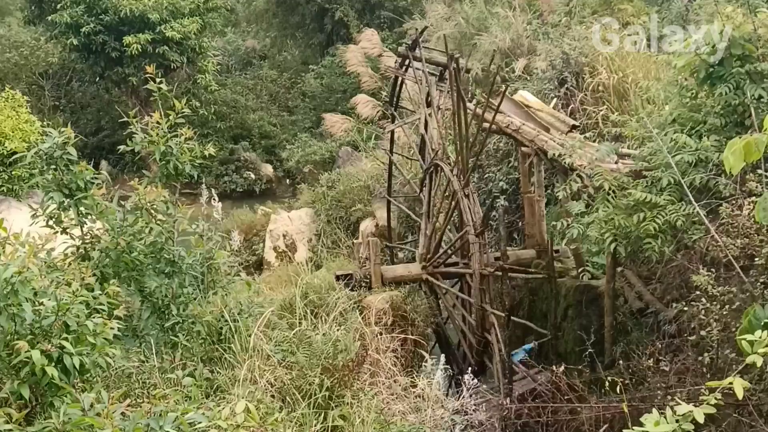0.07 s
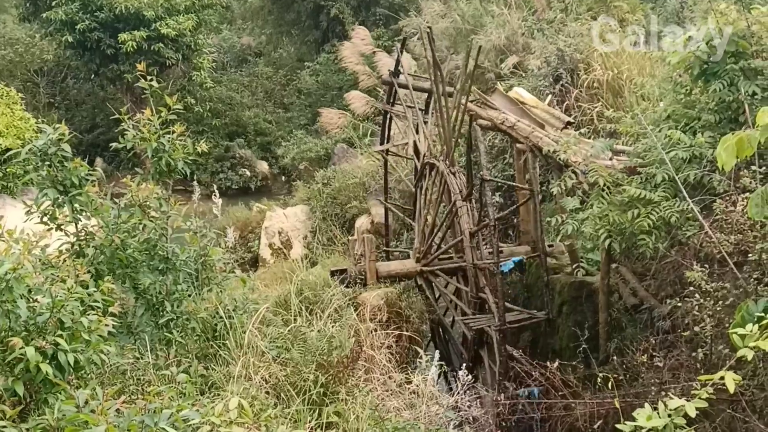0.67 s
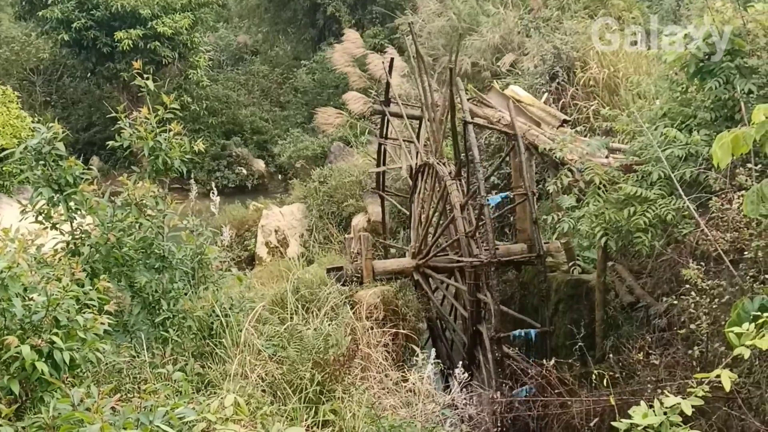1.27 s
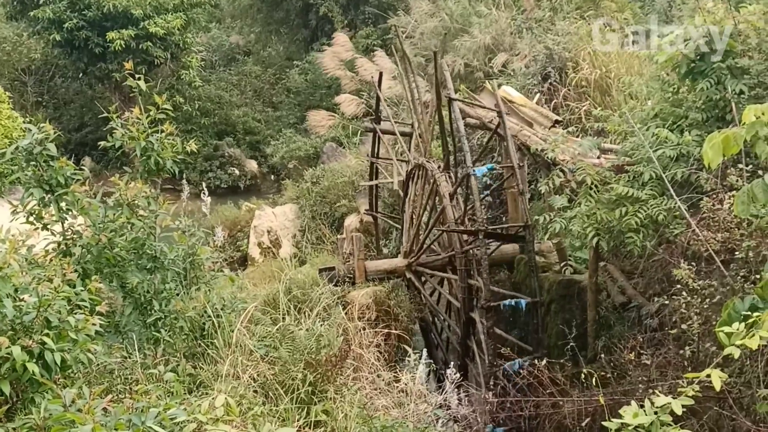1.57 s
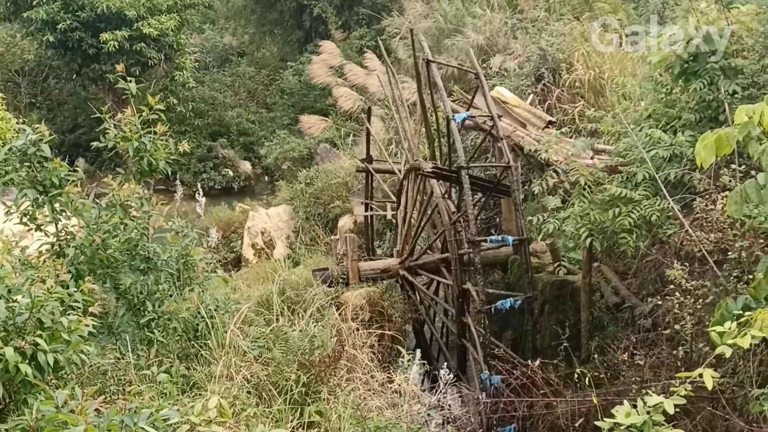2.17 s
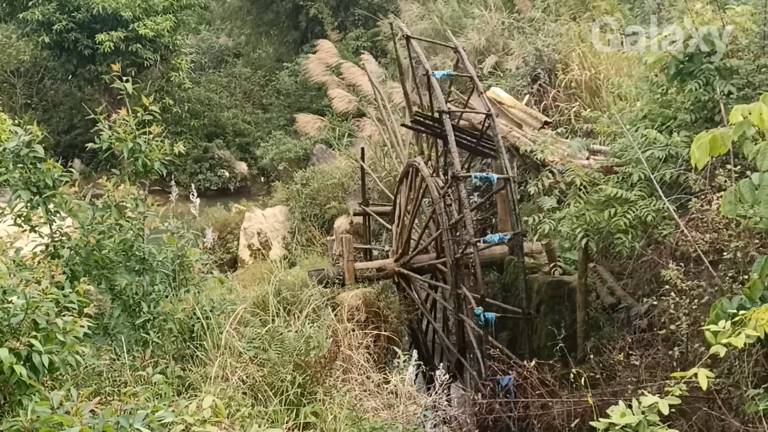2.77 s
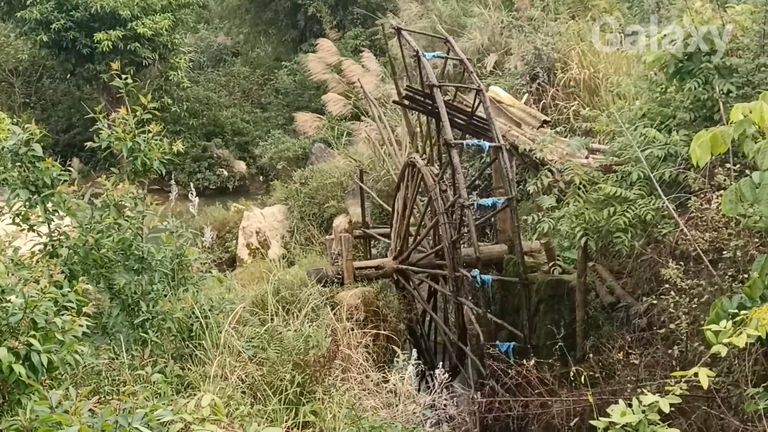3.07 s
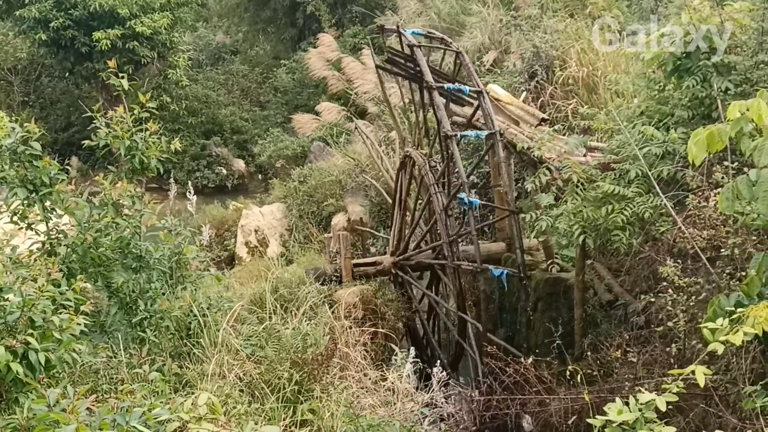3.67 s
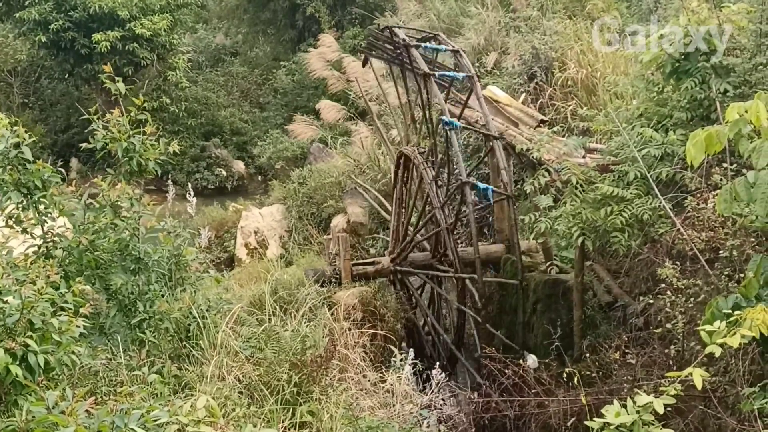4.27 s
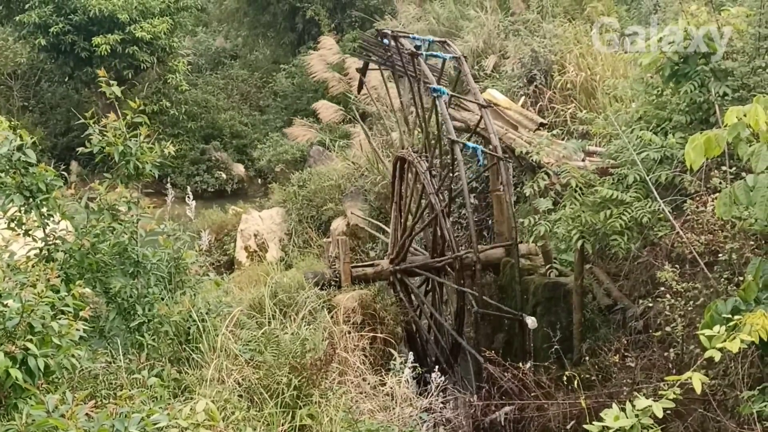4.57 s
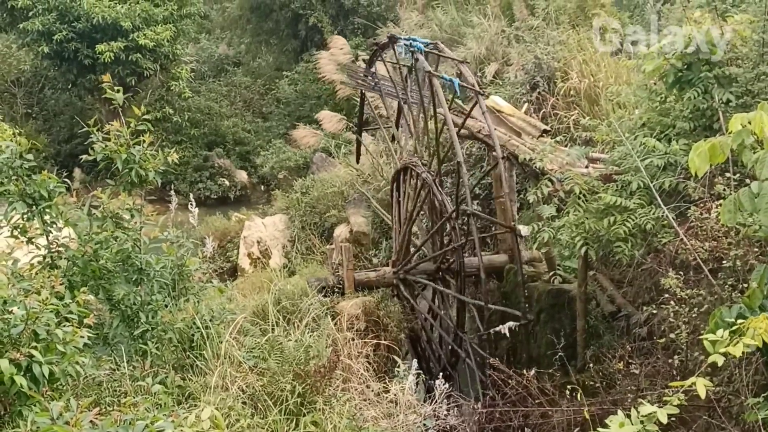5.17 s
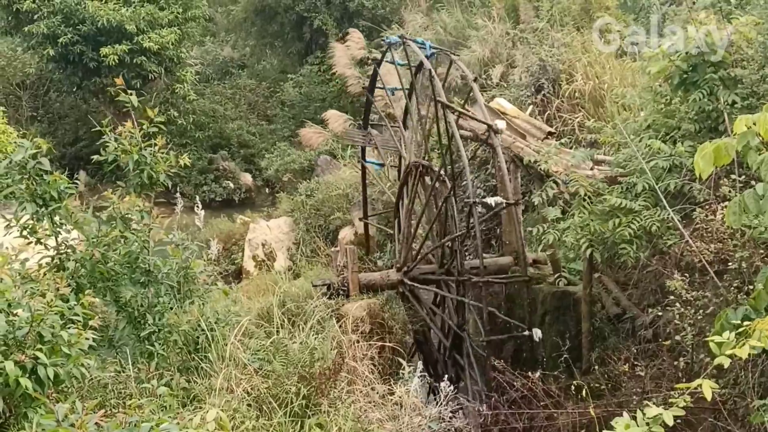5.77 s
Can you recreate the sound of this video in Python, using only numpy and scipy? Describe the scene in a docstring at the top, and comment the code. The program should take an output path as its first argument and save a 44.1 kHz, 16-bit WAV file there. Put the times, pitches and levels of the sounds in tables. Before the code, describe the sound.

The sound fades in during the first second on a stream running past a wooden waterwheel, heard outdoors from some metres away. The water rushes steadily throughout, with small bubbles gurgling in the channel and a hissing spatter spilling off the wheel. A few brief, bright splats stand out, around 1.1, 2.3, 2.7 and 4.3 seconds. From about half a second, wind buffets the microphone with a low, uneven rumble and hard thumps. It is loudest between 1.3 and 2 seconds, eases, then hits again from 3.2 to 3.5 seconds and around 4 seconds. After a last thump at 4.3 seconds the wind drops away. From about 4.7 seconds the water is heard alone, churning slightly more fully, its hiss drifting and swishing in tone until the end at around 6 seconds.

```python
"""A stream runs past a wooden waterwheel among bushes, heard from some metres away.
Bubbles gurgle in the channel; water spilling off the wheel hisses, spatters and splats.
Gusts buffet the microphone with rumble and hard eddies until the wind drops.
The sound fades in; towards the end the broad bands of the hiss drift and change colour."""
import sys
import numpy as np
from scipy import signal
from scipy.fft import rfft, irfft
from scipy.io import wavfile
from scipy.ndimage import uniform_filter1d

SR = 44100
rng = np.random.default_rng(int(sys.argv[2]) if len(sys.argv) > 2 else 0)


def digitize_waveform(pressure):
    """Quantize a signal to 16-bit integers and store it at the path in sys.argv[1].

    Rows of a 2-D input are taken as channels; values are limited to [-1, 1].
    """
    field = np.atleast_2d(pressure).T
    bounded = np.clip(field, -1, 1)
    quanta = np.round(bounded * 32767).astype(np.int16)
    wavfile.write(sys.argv[1], SR, quanta)


N = 260631
TIME_S = np.arange(N) / SR
FREQ_HZ = np.fft.rfftfreq(N, 1 / SR)


def gain_of(db):
    """Decibels to amplitude."""
    return 10 ** (np.asarray(db) / 20)


def unit_rms(x):
    """Scale to rms 1."""
    return x / np.sqrt(np.mean(x ** 2) + 1e-20)


def spectrum_db(points, hz):
    """Interpolate levels on a log-frequency axis."""
    freq_hz, level_db = np.transpose(points)
    return np.interp(np.log(hz + 1), np.log(freq_hz + 1), level_db)


def bell(x, centre, sigma):
    """Gaussian of height 1."""
    return np.exp(-.5 * ((x - centre) / sigma) ** 2)


def add(mix, start_s, sound):
    """Mix a sound in at start_s."""
    part = mix[max(round(start_s * SR), 0):][:len(sound)]
    part += sound[:len(part)]


def noise(bin_gains, samples=N):
    """Spectrally shaped noise, rms 1."""
    return unit_rms(irfft(rfft(rng.standard_normal(samples)) * bin_gains, samples))


def wander(rate_hz):
    """Slow random modulation, rms 1."""
    return noise(1 / (1 + (FREQ_HZ / rate_hz) ** 2))


def patches(shape, bins, frames):
    """Random blotches over frequency and time, rms 1."""
    field = uniform_filter1d(rng.standard_normal(shape), bins, axis=0)
    return unit_rms(uniform_filter1d(field, frames, axis=1))


def spatter(drops_per_s=380, spread_db=2.5, drop_s=0.0011, spray_s=0.026, spray_ratio=0.075, wash=0.53):
    """White excitation: each drop is a sharp burst plus spray, over a wash of smaller drops."""
    t = np.arange(4000) / SR
    hits = rng.random(N) < drops_per_s / SR
    drop_db = spread_db * np.minimum(rng.exponential(1, N), 4)
    decay = np.exp(-t / drop_s) + spray_ratio * np.exp(-t / spray_s)
    power = signal.oaconvolve(hits * gain_of(drop_db) ** 2, decay)[:N]
    return np.sqrt(wash + (1 - wash) * abs(power) / power.mean()) * rng.standard_normal(N)


def drifted(row, hz, drift):
    """Shape and dB of a band or hollow at drift 0..1; width scales with centre."""
    early_hz, sigma_hz, early_db, late_hz, late_db = row
    centre_hz = early_hz + (late_hz - early_hz) * drift
    return bell(hz, centre_hz, sigma_hz * centre_hz / early_hz), early_db + (late_db - early_db) * drift


# Stream rush: freq_hz, level_db
RUSH_SPECTRUM = [(30, -49), (60, -21.5), (120, -17), (280, -20), (400, -20), (700, -20), (1080, -23.5),
                 (1700, -24.5), (2100, -29.5), (3000, -33.5), (6000, -33), (8600, -39), (10200, -43),
                 (15500, -44.5)]
# Channel resonances under the wheel: centre_hz, sigma_hz, gain_db
CHANNEL_RESONANCES = [(505, 92, 5.5), (830, 91, 3), (1320, 81, 2.2)]
# Hiss bands, before and after the drift: early_hz, sigma_hz, early_db, late_hz, late_db
HISS_BANDS = [(4315, 670, -25.5, 2670, -29), (4900, 270, -31.5, 4100, -35), (5400, 420, -58, 6000, -32.5),
              (7213, 376, -24, 7200, -27.5), (11500, 440, -40.5, 11500, -49), (14100, 970, -38, 13900, -36)]
# Hollows between the bands: early_hz, sigma_hz, early_db, late_hz, late_db
HISS_HOLLOWS = [(2590, 257, -4, 2300, -5), (5640, 220, -2.5, 4700, -2), (9900, 770, -.5, 10700, -2.5)]
# Brief swells and dips in the hiss: middle_s, sigma_s, centre_hz, sigma_hz, glide_hz_per_s, gain_db
HISS_SWISHES = [(5.13, 0.15, 2400, 330, -900, -6), (5.21, 0.12, 3800, 450, -1000, 3.5),
                (4.87, .13, 7000, 550, -2500, -2), (5.44, .14, 4940, 570, 1800, 6),
                (5.35, 0.11, 8800, 600, 1000, 4.5), (5, 0.099, 7100, 530, 1500, -9),
                (4.56, 0.088, 7700, 600, 4, 5), (4.75, 0.17, 10300, 790, 0, -5),
                (5.42, .13, 2900, 470, -800, -4.5), (4.68, 0.11, 15000, 900, 0, -5),
                (4.93, .07, 13850, 350, 0, 3), (5.78, .11, 13600, 450, 0, 2)]


def water_colour(hz, t, drift):
    """Time-frequency gain: rush through the resonant channel, plus the shifting hiss."""
    channel_db = sum(db * bell(hz, centre_hz, sigma_hz) for centre_hz, sigma_hz, db in CHANNEL_RESONANCES)
    power = gain_of(spectrum_db(RUSH_SPECTRUM, hz) + channel_db) ** 2
    for band in HISS_BANDS:
        shape, level_db = drifted(band, hz, drift)
        power = power + gain_of(level_db) ** 2 * shape
    gain = np.sqrt(power)
    for hollow in HISS_HOLLOWS:
        shape, gain_db = drifted(hollow, hz, drift)
        gain *= gain_of(gain_db * shape)
    for middle_s, sigma_s, centre_hz, sigma_hz, glide_hz_per_s, gain_db in HISS_SWISHES:
        shape = bell(hz, centre_hz + glide_hz_per_s * (t - middle_s), sigma_hz)
        gain *= gain_of(gain_db * bell(t, middle_s, sigma_s) * shape)
    return gain


def water(drift_start_s=4.68, drift_length_s=0.67, churn_rise_db=2.0, surge_db=0.13, crossover_hz=2200):
    """Stream and wheel: spill flickers in the treble; churn moves the lows and grows with the drift."""
    drive = spatter() * gain_of(surge_db * wander(rate_hz=19))
    hz, t, spectra = signal.stft(drive, SR, nperseg=1024, noverlap=768)
    hz = hz[:, None]
    drift = np.clip((t - drift_start_s) / drift_length_s, 0, 1)
    treble = 1 / (1 + (crossover_hz / (hz + 1)) ** 4)
    spill_db = 1 + patches(spectra.shape, bins=16, frames=5)
    churn_db = 0.46 + churn_rise_db * drift + 0.94 * patches(spectra.shape, bins=4, frames=7)
    spectra *= water_colour(hz, t, drift) * gain_of(treble * spill_db + (1 - treble) * churn_db)
    return signal.istft(spectra, SR, nperseg=1024, noverlap=768)[1][:N]


def bubble(pitch_hz, decay_cycles, rise):
    """Trapped air rings briefly, rising in pitch as it nears the surface."""
    cycles = pitch_hz * np.arange(6000) / SR
    envelope = (1 - np.exp(-cycles)) * np.exp(-cycles / decay_cycles)
    return envelope * np.sin(2 * np.pi * cycles * (1 + rise * cycles / decay_cycles / 2))


# Largest bubbles: start_s, level_db, pitch_hz
LARGE_BUBBLES = [(1.02, -25, 593), (2.535, -23, 516), (2.96, -26, 497), (3.06, -25.5, 527),
                 (3.285, -26, 833), (3.77, -26, 486), (4.35, -22.5, 551), (5.5, -25.5, 482),
                 (5.875, -24.5, 490)]


def gurgle(small_rms_db=-41, median_hz=700, spread_oct=.7, spread_db=3, count=700):
    """Many small bubbles in the channel; a few large ones ring longer."""
    small, large = np.zeros(N), np.zeros(N)
    starts_s = rng.random(count) * N / SR
    pitches_hz = median_hz * 2 ** (spread_oct * rng.standard_normal(count))
    levels_db = spread_db * np.minimum(rng.exponential(1, count), 3.5)
    for start_s, level_db, pitch_hz in zip(starts_s, levels_db, pitches_hz):
        gain = gain_of(level_db) * min(median_hz / pitch_hz, 1)
        add(small, start_s, gain * bubble(pitch_hz, decay_cycles=10, rise=0.0446))
    for start_s, level_db, pitch_hz in LARGE_BUBBLES:
        add(large, start_s, gain_of(level_db) * bubble(pitch_hz, decay_cycles=17.4, rise=0.0097))
    return gain_of(small_rms_db) * unit_rms(small) + large


# Gusts: start_s, length_s, strength_db
WIND_GUSTS = [(.27, .045, -29), (0.525, 0.071, -19.5), (0.648, 0.078, -25.5), (0.943, 0.15, -17.5),
              (1.21, .11, -26.5), (1.316, 0.11, -16), (1.427, 0.11, -15), (1.534, 0.13, -12),
              (1.698, 0.13, -11.5), (1.811, 0.17, -15), (1.97, .11, -23.5), (2.127, .05, -20.5),
              (2.26, 0.15, -23.5), (2.677, 0.22, -25.5), (3.245, .09, -21.5), (3.344, 0.058, -17.5),
              (3.441, 0.15, -15.5), (3.845, 0.062, -19.5), (3.925, 0.13, -24), (4.057, 0.28, -26.5),
              (4.3, 0.038, -22)]


def airflow(breeze_db=-35, calm_start_s=4.31, fall_db_per_s=70, arch_exponent=0.3):
    """Wind strength: squarish gusts over a breeze that drops to a calm."""
    power = gain_of(breeze_db - fall_db_per_s * np.maximum(TIME_S - calm_start_s, 0)) ** 2
    for start_s, length_s, strength_db in WIND_GUSTS:
        arch = np.sin(np.pi * np.arange(0, length_s, 1 / SR) / length_s).clip(0) ** arch_exponent
        add(power, start_s, (gain_of(strength_db) * arch) ** 2)
    return np.sqrt(power)


# Wind rumble: freq_hz, relative_db
RUMBLE_SPECTRUM = [(20, -50), (45, -13), (72, -1), (118, 1.5), (170, -4.5), (250, -8.5), (400, -20.5),
                   (700, -29.5), (1500, -46), (4000, -74)]
# Tearing in strong gusts: freq_hz, relative_db
TEAR_SPECTRUM = [(70, -22), (120, 8), (220, -0.5), (300, 2), (400, -4.5), (700, -18.5), (1500, -33),
                 (4000, -69)]


def wind(reference_db=-15, rumble_db=-3.5, tear_db=-8, flutter_db=2.0):
    """Turbulence at the microphone: faster air sheds smaller eddies, so tearing outgrows rumble."""
    strength = airflow() / gain_of(reference_db)
    rumble = noise(gain_of(spectrum_db(RUMBLE_SPECTRUM, FREQ_HZ)))
    rumble /= np.sqrt(uniform_filter1d(rumble ** 2, size=1400))  # flatten its own slow swells
    tear = noise(gain_of(spectrum_db(TEAR_SPECTRUM, FREQ_HZ)))
    air = gain_of(rumble_db) * strength ** 0.74 * rumble + gain_of(tear_db) * strength ** 1.85 * tear
    return gain_of(reference_db + flutter_db * wander(rate_hz=43)) * air


# Hardest eddies: middle_s, level_db, pitch_hz
EDDY_STRIKES = [(.958, -14.5, 110), (.993, -8, 110), (1.397, -4, 157), (1.583, -2.5, 157), (1.63, 3, 249),
                (1.718, -4, 129), (1.772, -6, 160), (1.8, .5, 186), (2.433, -6, 108), (2.48, -8.5, 121),
                (3.269, -2, 118), (3.305, -3.5, 118), (3.373, -5, 161), (3.462, -4.5, 200),
                (3.523, -9, 147), (3.536, -1.5, 174), (3.877, -14, 130), (3.997, -8.5, 130),
                (4.03, -7.5, 170), (4.319, -7, 137)]


def eddies(width_cycles=0.49, trim_db=-1):
    """Each eddy hits the microphone as a short, steep pressure swing whose shape varies from hit to hit."""
    out, t = np.zeros(N), np.arange(-900, 900) / SR
    for middle_s, level_db, pitch_hz in EDDY_STRIKES:
        cycles = pitch_hz * t
        swing = np.cos(2 * np.pi * (cycles + rng.random())) / np.cosh(2 * cycles / width_cycles)
        add(out, middle_s + t[0], gain_of(level_db + trim_db) * swing * np.hanning(len(t)))
    return out


# Loud splats: start_s, level_db, centre_hz, sigma_oct, decay_s
WHEEL_SPLATS = [(1.087, -24.5, 4560, 0.12, .012), (1.102, -21.5, 4830, 0.57, .0055),
                (2.25, -27, 4300, .2, .008), (2.29, -26, 6950, 0.12, .007), (2.712, -24, 4200, 0.23, .012),
                (4.262, -29, 3900, 0.12, 0.032), (4.388, -27, 4000, .16, 0.0043),
                (5.468, -32.5, 7700, .25, .011)]


def splats(trim_db=-1, samples=4096):
    """Dollops fall off the wheel, each a short bright noise burst."""
    out, t = np.zeros(N), np.arange(samples) / SR
    freq_oct = np.log2(np.fft.rfftfreq(samples, 1 / SR) + 1)
    for start_s, level_db, centre_hz, sigma_oct, decay_s in WHEEL_SPLATS:
        burst = noise(bell(freq_oct, np.log2(centre_hz), sigma_oct), samples)
        add(out, start_s, gain_of(level_db + trim_db) * burst * np.exp(-t / decay_s))
    return out


def scene():
    """Stream and wheel plus wind, mono."""
    return (water() + splats() + gurgle() + wind() + eddies())[None]


# Fade-in: time_s, gain_db
FADE_IN = [(.085, -74), (.094, -26), (.124, -25.5), (.135, -17), (.25, -10), (.36, -4.5), (.57, -5),
           (.75, -1)]


def record(dry, low_cut_hz=50, high_cut_hz=15560, ceiling=.97):
    """Fade in, high-pass, soft-clip, low-pass."""
    faded = dry * gain_of(np.interp(TIME_S, *np.transpose(FADE_IN)))
    cut = signal.sosfilt(signal.butter(3, low_cut_hz, "high", fs=SR, output="sos"), faded)
    rounded = cut / (1 + (cut / ceiling) ** 6) ** (1 / 6)
    low_pass = signal.firwin(801, high_cut_hz, window=("kaiser", 9), fs=SR)
    return signal.oaconvolve(rounded, low_pass[None], "same")


dry = scene()
out = record(dry)
digitize_waveform(out)
```